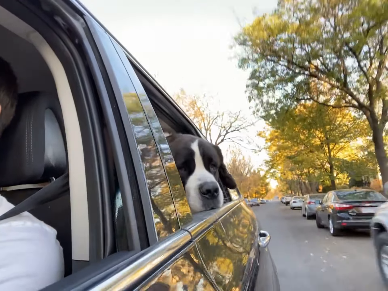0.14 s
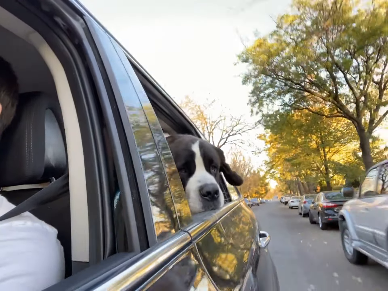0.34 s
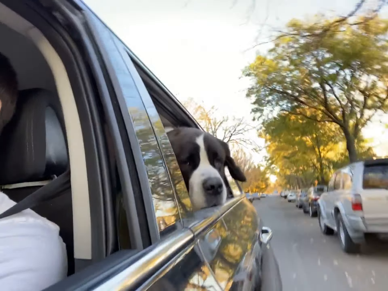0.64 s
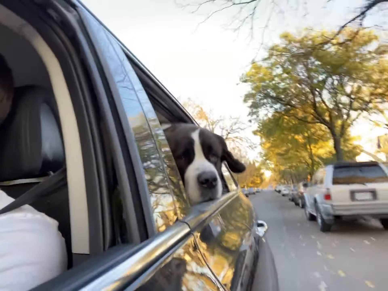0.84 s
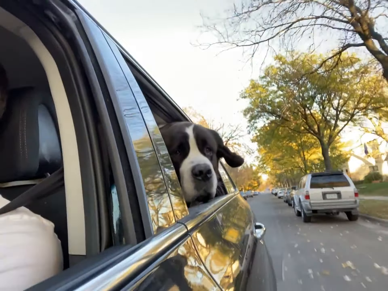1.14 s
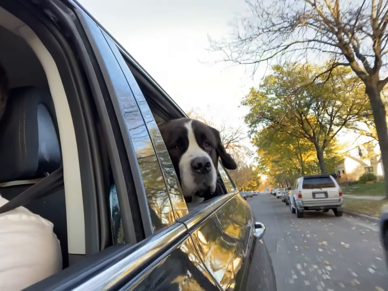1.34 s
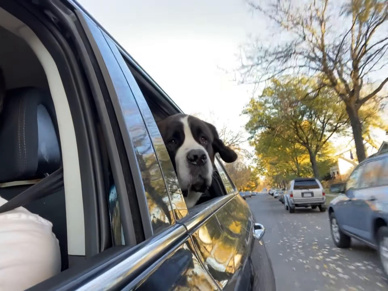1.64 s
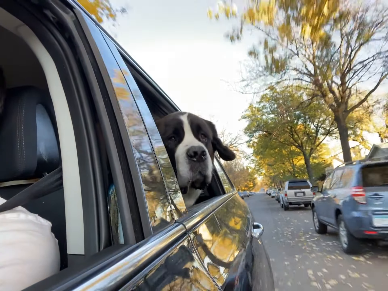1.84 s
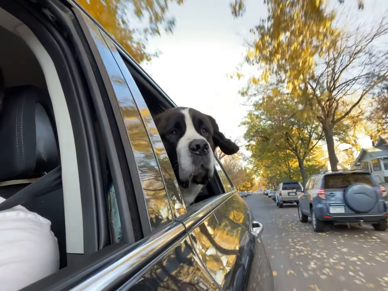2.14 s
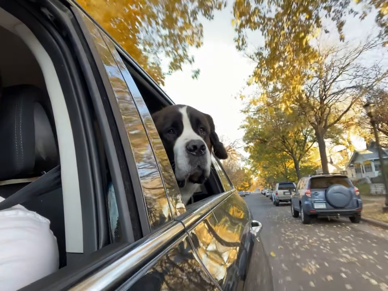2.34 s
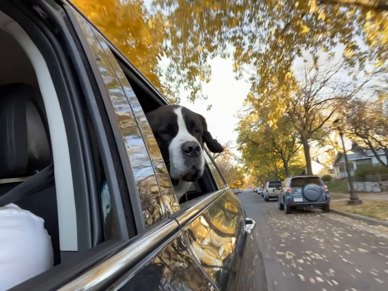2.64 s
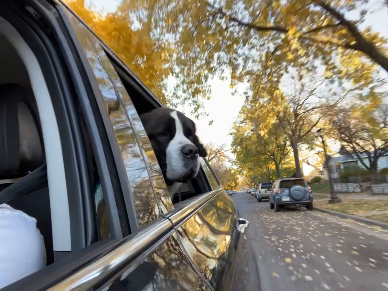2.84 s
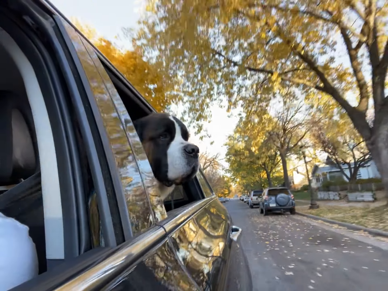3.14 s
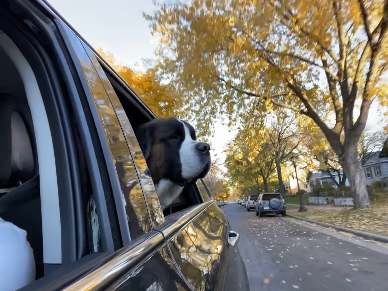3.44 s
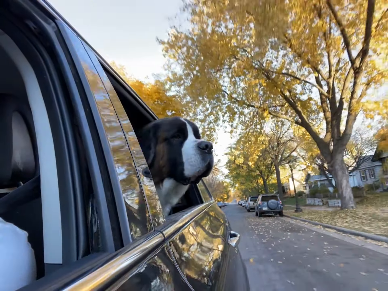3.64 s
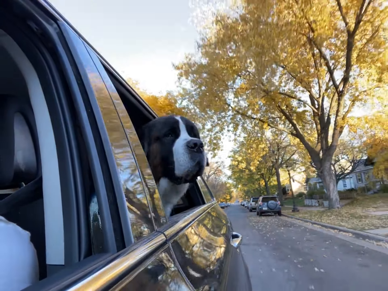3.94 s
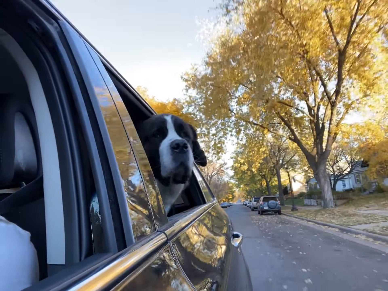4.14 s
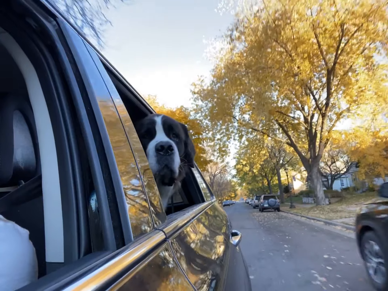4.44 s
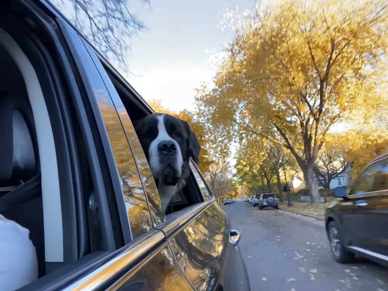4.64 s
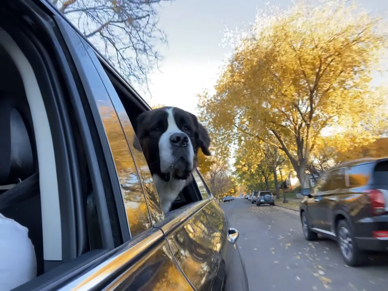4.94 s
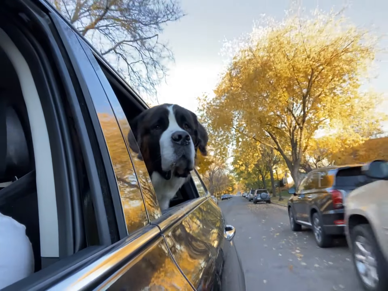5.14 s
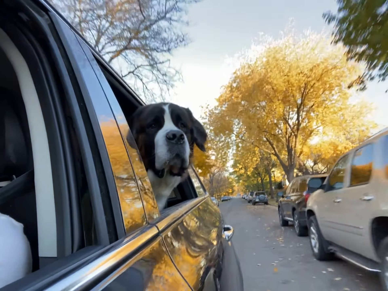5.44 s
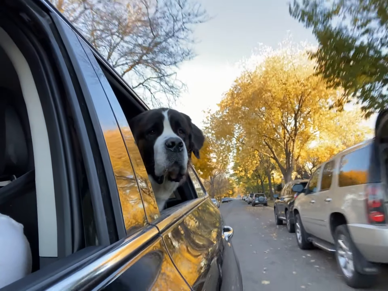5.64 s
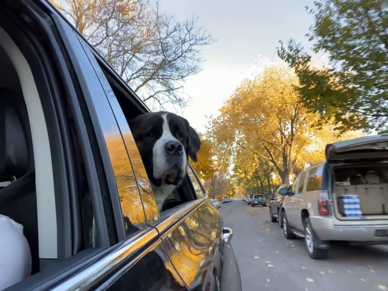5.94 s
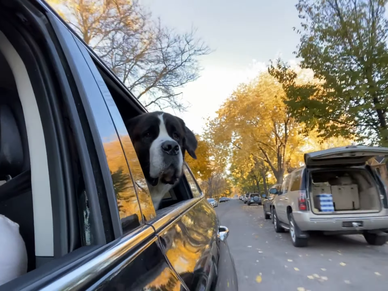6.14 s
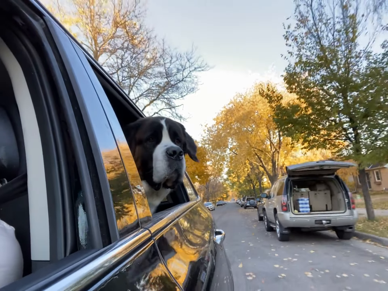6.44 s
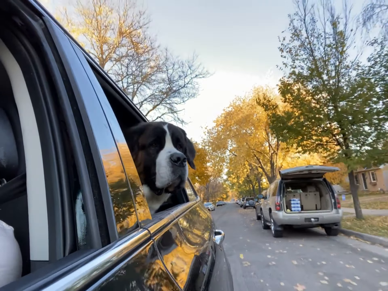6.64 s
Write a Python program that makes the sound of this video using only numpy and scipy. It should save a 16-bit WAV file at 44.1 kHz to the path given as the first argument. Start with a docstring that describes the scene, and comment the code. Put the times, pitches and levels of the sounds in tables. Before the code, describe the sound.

Rough gusting wind thumps and flutters right on the microphone as a car rolls down a street, faint tyre hiss buried underneath.

```python
"""Wind rumbles, flutters and thuds on a microphone held out of the window of a car rolling down a leafy street.
Faint tyre hiss, swells off parked cars and crisp ticks lie underneath.
One air stream sets the rumble, flutter and small snaps: it gusts, lets go ever more often,
drops away near the end and partly returns. Listed vortices add short falling thuds; a limiter rounds
off the biggest."""
import sys
import numpy as np
from scipy import signal
from scipy.fft import rfft, irfft
from scipy.io import wavfile
from scipy.ndimage import uniform_filter1d, minimum_filter1d

SR = 44100
rng = np.random.default_rng(int(sys.argv[2]) if len(sys.argv) > 2 else 0)


def to_wav(sig):
    """Store sig (one row per channel, or 1-D mono) as 16-bit WAV at the path in sys.argv[1].

    Samples outside -1..1 are clipped; the rate is SR.
    """
    pcm = np.clip(np.atleast_2d(sig), -1, 1) * 32767
    pcm = np.round(pcm).astype(np.int16)
    wavfile.write(sys.argv[1], SR, pcm.T)  # frames by channels


N = 298998
TIME_S = np.arange(N) / SR
FREQS_HZ = np.fft.rfftfreq(N, 1 / SR)

# Tyre roar and grit sizzle. Each row: time in seconds, relative roar level in dB, relative sizzle level in dB.
TYRE_LEVELS = [(0, -60, -74), (.6, -61.5, -73), (1.15, -58, -65), (1.45, -61, -69), (2.2, -60.5, -70),
               (3.2, -61, -70), (4.3, -60, -69), (5.1, -61, -65.5), (6.06, -63, -69), (6.16, -60.5, -68),
               (6.78, -61.5, -67.5)]
# Rush of the tread on the asphalt. Each row: time in seconds, relative level in dB.
TREAD_LEVELS = [(0, -51.5), (.7, -52), (2.1, -55), (3.8, -49), (4.8, -50.5), (5.2, -61), (5.9, -78),
                (6.7, -72)]
# Spectrum of the rolling roar. Each row: frequency in Hz, relative density in dB.
ROAR_SPECTRUM = [(40, 23.5), (150, 37), (400, 22.5), (650, 14), (1000, 16.5), (1500, 8.5), (2200, 4),
                 (3000, 2.5), (5000, 0), (8000, -4.5), (10000, -13.5), (15000, -29)]
# Spectrum of the tread rush. Each row: frequency in Hz, relative density in dB.
TREAD_SPECTRUM = [(500, -17.5), (1200, 10), (2200, 9), (2900, 1.5), (4200, -10), (7000, -32.5),
                  (12000, -40)]
# Spectrum of the grit and leaf sizzle. Each row: frequency in Hz, relative density in dB.
SIZZLE_SPECTRUM = [(3000, -36), (7000, -7), (9500, 0.5), (12000, -1), (14000, -5), (16000, -19)]
# Resonances of roar and tread. Each row: centre in Hz, full width in Hz, boost in dB (negative dips).
TYRE_RESONANCES = [(890, 110, 3), (2150, 190, 2.5), (3480, 220, 3.5), (4300, 250, -0.5), (5970, 500, 1),
                   (8700, 600, 2)]
# Tyre noise off parked cars. Each row: centre in seconds, Gaussian spread in seconds, level in dB,
# centre frequency in Hz, Gaussian spread in octaves.
PARKED_CAR_SWISHES = [(.58, 0.11, -60, 4600, 0.36), (1.12, 0.23, -58.5, 4200, 0.19),
                      (4.098, 0.23, -61, 1990, 0.25), (4.8, 0.12, -55, 2300, .25)]
# Crisp street ticks. Each row: start in seconds, level in dB, centre frequency in Hz, decay to 1/e in seconds.
STREET_TICKS = [(.8276, -57, 11000, .012), (1.1364, -60, 12000, .03), (1.4731, -52, 10000, .003),
                (1.7425, -55, 9500, .01), (1.9266, -51, 12000, .003), (2.051, -44, 8000, 0.0027),
                (2.082, -55, 14000, .002), (2.1935, -58, 11000, .005), (2.2154, -55, 10000, .007),
                (3.9285, -54, 9500, .006), (5.478, -56, 13000, .015), (5.5027, -41, 5200, 0.0022),
                (6.1954, -49, 7500, .003), (6.6259, -51, 6070, .012)]
# Base strength of the air stream. Each row: time in seconds, level in dB.
STREAM_LEVELS = [(0, -11), (1, -12), (2.6, -11.5), (3.8, -13.5), (4.6, -13.5), (5.2, -12), (5.8, -14),
                 (6.26, -18), (6.42, -31.5), (6.78, -18.5)]
# The stream lets go. Each row: centre in seconds, Gaussian spread in seconds, depth in dB (negative lifts).
STREAM_LULLS = [(.41, 0.009, 6), (.495, .012, 6.5), (.83, 0.0058, 13), (1.52, .012, 1), (1.625, 0.025, 5),
                (2.22, 0.037, 3.5), (2.55, 0.011, 14.5), (2.75, 0.0064, 18.5), (3.18, 0.009, 11),
                (3.245, 0.0081, -0.5), (3.95, 0.011, 10.5), (4.37, 0.017, 3.5), (4.91, 0.075, 1),
                (5.03, 0.026, 9), (5.31, 0.045, 10), (5.45, .015, 8.5), (5.605, 0.038, 7.5),
                (5.87, 0.012, 8.5), (5.945, 0.014, 9), (6.108, 0.029, 21.5), (6.46, .03, 3.5),
                (6.63, .018, 19.5), (6.73, 0.017, 11.5)]
# Broad eddies on the diaphragm. Each row: centre in seconds, Gaussian spread in seconds,
# rumble boost in dB (negative cuts).
BROAD_THUMPS = [(2.59, 0.021, 5), (2.77, 0.0071, -3), (3.28, 0.0077, 9.5), (3.98, 0.024, 6.5),
                (4.99, 0.01, 13.5), (5.7, 0.017, 4), (6.02, 0.027, 4.5), (6.25, 0.027, 7),
                (6.58, 0.019, 10.5)]
# Spectrum of the large eddies. Each row: frequency in Hz, relative density in dB.
RUMBLE_SPECTRUM = [(12, -33.5), (28, -46), (40, -27.5), (52, -6), (64, -1.5), (85, 0.5), (115, -3.5),
                   (160, -9), (230, -15.5), (400, -28.5), (900, -81)]
# Spectrum of the small eddies. Each row: frequency in Hz, relative density in dB.
FLUTTER_SPECTRUM = [(60, -15.5), (130, -7), (210, 3.5), (300, -4), (420, -1.5), (600, -8), (800, -9.5),
                    (1000, -15), (1500, -27.5), (2000, -43.5), (3000, -53), (5000, -71)]
# Strongest vortices at the port. Each row: core time in seconds, relative level in dB,
# treble loss in dB per kHz, relative swirl level in dB.
VORTICES = [(0.062, -8.5, 12, -12), (0.1184, -5, 6, -12.5), (0.1239, -5.5, 11, -22), (0.238, -8.5, 27, -17),
            (0.3109, -12.5, 19.5, -3.5), (0.379, -5, 15, -13.5), (.425, -13.5, 23, -20),
            (.4403, -6, 13.5, -25), (0.5124, -4.5, 17, -14), (.571, -8, 15, -10),
            (0.6512, -1.5, 17.5, -8.5), (0.7102, -9, 18, -18), (0.7789, -2.5, 18.5, -4.5),
            (0.8087, -8, 10, -29), (.886, -10, 14.5, -19), (0.92, -12.5, 9, -2), (0.9879, -3.5, 11, -9.5),
            (1.0356, -4, 16.5, -23), (1.1996, -4, 15.5, -15), (1.2244, -7, 13, -3), (1.2699, -15.5, 23, -5),
            (1.3578, 3, 14.5, -16.5), (1.402, -11.5, 22, -5.5), (1.4523, -3, 15.5, -38),
            (1.4661, -1, 14, -11.5), (1.5567, 1, 19.5, -17), (1.603, -13.5, 8.5, -7), (1.653, -9, 28.5, -5),
            (1.735, 0, 13, -20.5), (1.8568, -6.5, 19, -23), (1.89, -16, 10.5, -5.5), (1.9543, -7, 22, -11),
            (1.9939, -7, 26, -23), (2.1281, -9.5, 30.5, -13), (2.1531, -10.5, 18, -22),
            (2.189, -7, 25, -11), (2.2826, -0.5, 11.5, -18.5), (2.3043, -2.5, 11, -27),
            (2.3504, -5, 13.5, -12), (2.4439, -15, 7.5, -26), (2.452, -11.5, 23, -25),
            (2.5855, -8, 23, -20), (2.6691, -7, 13, -18), (2.7045, -5, 18, -12), (2.794, -2.5, 17.5, -25),
            (2.8555, -9.5, 21, 0), (3.01, -3.5, 10.5, -24), (3.059, -8, 20.5, -17),
            (3.096, -2.5, 18.5, -2.5), (3.2052, -4.5, 16, -24), (3.275, -2, 13.5, -3.5),
            (3.483, 6.5, 12.5, -26), (3.5107, 1, 24.5, 5), (3.5477, -11, 24, -2), (3.595, -3, 22.5, -11),
            (3.6366, -9, 14, -15), (3.727, -7, 19.5, -9), (3.7762, -5.5, 20, -10.5),
            (3.832, -4.5, 29, -15.5), (3.8649, -17, 40, -16), (3.9843, -9.5, 21.5, -10),
            (4.049, -12, 12.5, -15), (4.0964, -1, 11, -19), (4.152, -8.5, 19, -11.5),
            (4.244, -6, 17.5, -13), (4.2683, -5, 17, -28), (4.285, -9.5, 21, -1), (4.3266, -4, 17, -10),
            (4.3355, -7, 14, -18), (4.3856, -14, 23, -3.5), (4.4271, -17, 16, -16), (4.5776, -13, 16, -4.5),
            (4.738, -6, 15.5, -5.5), (4.7506, -15, 21, -1), (4.7654, -4.5, 16, -18), (4.794, -8, 22, -12),
            (4.827, -10.5, 20, -18), (4.9802, -5.5, 14.5, -11), (5.0626, -14.5, 12.5, -30),
            (5.143, -8, 47, -17), (5.1747, -6, 14, -24), (5.2027, -13.5, 21, 1), (5.276, -2.5, 22.5, -18.5),
            (5.398, -13.5, 15, -3), (5.4128, -10, 21.5, -4), (5.5545, -12, 27.5, -13),
            (5.6226, -16.5, 37, 1.5), (5.7014, -10.5, 20.5, -16), (5.7619, -11, 21, -18),
            (5.7741, -9, 29.5, 3), (5.8321, -14.5, 17, -21), (5.8993, -11.5, 18.5, -13),
            (5.9659, -21, 40, 4.5), (6.0193, -13.5, 26, -3), (6.1507, -14.5, 27, -5.5),
            (6.1778, -19.5, 41, -8), (6.3722, -25, 26, -4), (6.3926, -22.5, 23.5, -5.5),
            (6.678, -12.5, 32, -5)]

# At FULL_WIND_DB small eddies have strength FLUTTER_DB; they change FLUTTER_DB_PER_DB for each dB of stream.
FULL_WIND_DB, FLUTTER_DB, FLUTTER_DB_PER_DB = -12.5, -18.5, 1.38
EDGE_HZ = 15800  # top of the output band


def gain_of(db):
    """Decibels to amplitude."""
    return 10 ** (np.asarray(db) / 20)


def evened(x):
    """Scales to rms 1."""
    return x / np.sqrt(np.mean(x ** 2) + 1e-20)


def steadied(x, span_s):
    """Scales to rms near 1 over every stretch of about span_s."""
    width = max(int(span_s * SR), 2)
    power = uniform_filter1d(uniform_filter1d(x ** 2, width), width)
    return x / np.sqrt(abs(power) + 1e-12)


def level(table, column):
    """One dB column of a curve as a gain for every sample."""
    rows = np.array(table)
    return gain_of(np.interp(TIME_S, rows[:, 0], rows[:, column]))


def swell_db(table):
    """Gaussian swells, one for each row, summed in dB."""
    t = TIME_S[::32]  # coarse grid for speed
    total_db = sum(db * np.exp(-.5 * ((t - s) / spread_s) ** 2) for s, spread_s, db in table)
    return np.interp(TIME_S, t, total_db)


def colour(points):
    """A spectrum as a gain for every frequency, interpolated over log frequency."""
    hz, db = np.transpose(points)
    return gain_of(np.interp(np.log(FREQS_HZ + 1), np.log(hz), db))


def shaped(x, gains):
    """Filters by a gain for every frequency."""
    return irfft(rfft(x) * gains, N)


def noise(gains):
    """Noise of rms 1 with the given spectrum."""
    return evened(shaped(rng.standard_normal(N), gains))


def add(mix, s, sound):
    """Mixes a sound in at time s, cut off at the edges."""
    start = round(s * SR)
    sound = sound[max(-start, 0):]
    part = mix[max(start, 0):][:len(sound)]
    part += sound[:len(part)]


def ticks(width_octaves=.4):
    """Brief bright crackles: band noise dying exponentially."""
    out, t = np.zeros(N), TIME_S[:SR // 5]
    hz = np.fft.rfftfreq(len(t), 1 / SR) + 1
    for s, tick_db, centre_hz, decay_s in STREET_TICKS:
        band = np.exp(-.5 * (np.log2(hz / centre_hz) / width_octaves) ** 2)
        crackle = evened(irfft(rfft(rng.standard_normal(len(t))) * band, len(t)))
        add(out, s, gain_of(tick_db) * crackle * np.exp(-t / decay_s))
    return out


def swishes():
    """Each parked car returns a soft swell of hiss."""
    out = np.zeros(N)
    for s, spread_s, swish_db, centre_hz, octaves in PARKED_CAR_SWISHES:
        band = np.exp(-.5 * (np.log2((FREQS_HZ + 1) / centre_hz) / octaves) ** 2)
        swell = np.exp(-.5 * ((TIME_S - s) / spread_s) ** 2)
        out += gain_of(swish_db) * swell * noise(band)
    return out


def tyres(roar_db=1.0, tread_db=-1.5, sizzle_db=0.5, grain_db=3.5):
    """Resonant rolling roar and tread rush, plus a grainy sizzle from grit and dry leaves."""
    roar = noise(colour(ROAR_SPECTRUM))
    roar /= np.std(shaped(roar, (FREQS_HZ > 4000) & (FREQS_HZ < 8000)))  # level is set by its hiss
    roar = gain_of(roar_db) * level(TYRE_LEVELS, column=1) * roar
    tread = gain_of(tread_db) * level(TREAD_LEVELS, column=1) * noise(colour(TREAD_SPECTRUM))
    ring_db = sum(boost_db / (1 + (2 * (FREQS_HZ - hz) / width_hz) ** 2)
                  for hz, width_hz, boost_db in TYRE_RESONANCES)
    grains = gain_of(grain_db * noise(1 / (1 + FREQS_HZ / 300)))
    sizzle = evened(noise(colour(SIZZLE_SPECTRUM)) * grains)
    sizzle = gain_of(sizzle_db) * level(TYRE_LEVELS, column=2) * sizzle
    return shaped(roar + tread, gain_of(ring_db)) + sizzle


def airflow(gust_db=2.0, gust_hz=11, stall_db=1.0, stall_lead_s=0.004, stall_s=0.0083):
    """The stream gusts, lets go and stalls just before each big vortex; small eddies fade faster than large."""
    gusts = noise(FREQS_HZ / (FREQS_HZ + gust_hz) / np.sqrt(1 + (FREQS_HZ / gust_hz) ** 6))
    stalls = [(row[0] - stall_lead_s, stall_s, stall_db) for row in VORTICES]
    change_db = gust_db * gusts - swell_db(STREAM_LULLS) - swell_db(stalls)
    stream = level(STREAM_LEVELS, column=1) * gain_of(change_db)
    large = stream * gain_of(swell_db(BROAD_THUMPS))
    small = gain_of(FLUTTER_DB) * (stream / gain_of(FULL_WIND_DB)) ** FLUTTER_DB_PER_DB
    return large, small


def port(x, bass_lag_s=0.01618, corner_hz=140, steepness=1.71):
    """Bass passes the microphone port later than treble, so every jolt becomes a quick falling chirp."""
    lag_s = bass_lag_s / (1 + (FREQS_HZ / corner_hz) ** steepness)
    phase = -2 * np.pi * np.cumsum(lag_s) * SR / N  # group delay summed over frequency
    return shaped(x, np.exp(1j * phase))


def rumble(strength, db=-2.7, lump_db=1.5, lump_hz=22):
    """Large eddies push slowly on the diaphragm, in uneven lumps."""
    lump_band = np.exp(-(FREQS_HZ / lump_hz - 1) ** 2 * 4)
    lumps = evened(gain_of(lump_db * noise(lump_band)))
    return gain_of(db) * strength * lumps * steadied(noise(colour(RUMBLE_SPECTRUM)), span_s=0.065)


def flutter(strength, db=-4.0, clump_db=7.5, clump_rise=0.033, clump_hz=70, peak_limit=2.36, brighten=0.45):
    """Small eddies come in clumps; the smaller they are, the more they crowd into the fastest moments."""
    churn = noise(FREQS_HZ / (FREQS_HZ + 8) / np.sqrt(1 + (FREQS_HZ / clump_hz) ** 4))
    churn = np.minimum(churn, peak_limit)
    air = noise(colour(FLUTTER_SPECTRUM))
    octave = np.clip(np.log2((FREQS_HZ + 1) / 125), 0, 5)
    out = np.zeros(N)
    breeze = evened(uniform_filter1d(strength, size=SR // 3))  # a slack stream sheds fewer small eddies
    for k in range(6):  # overlapping octave bands
        band = np.maximum(1 - abs(octave - k), 0)
        clumps = evened(gain_of(clump_db * 2 ** (clump_rise * (k - 2)) * churn))
        out += clumps * breeze ** (brighten * k) * shaped(air, band)
    return gain_of(db) * strength * steadied(port(out), span_s=0.26)


def eddy_spectrum(hz, db_per_khz, tilt_db_per_octave=1.0, low_hz=105, knee_hz=1050, curve=1.096):
    """A vortex crossing the port is a smooth pressure pulse: the wider its core, the faster its treble falls."""
    fall_db = db_per_khz * knee_hz / 10 ** 3 * (hz / knee_hz) ** curve
    spectrum = gain_of(tilt_db_per_octave * np.log2(hz) - fall_db) / np.sqrt(1 + (low_hz / hz) ** 6)
    return spectrum * len(hz) / spectrum[hz > 400].sum()  # the part above 400 Hz could peak near 1


def eddy_pulse(spectrum):
    """The pulse pushes, sucks or does both, by the path of the vortex, drawn as a random phase."""
    pulse = np.fft.fftshift(irfft(spectrum * np.exp(2j * np.pi * rng.random())))
    return pulse * signal.windows.hann(len(pulse))


def snaps(strength, db=3.5, spread_db=8.5, sharpest_db_per_khz=11.5, dullest_db_per_khz=40,
          slack_db=12.0, hits_per_s=95, count=10, size=4096):
    """A scatter of lesser vortices of ten widths; the narrow ones fade first when the stream slackens."""
    hz, out = np.fft.rfftfreq(size, 1 / SR) + 1, np.zeros(N)
    stream = uniform_filter1d(strength, size=SR // 3)
    force = gain_of(spread_db * rng.uniform(-1, 1, N))
    struck = rng.random(N) < hits_per_s / SR
    hits = struck * force * np.minimum(strength, 0.78 * stream)  # the mean flow caps the stream's share
    width = rng.integers(0, count, N)
    fullness = np.minimum(evened(stream), 1) - 0.5
    for k, db_per_khz in enumerate(np.linspace(sharpest_db_per_khz, dullest_db_per_khz, count)):
        fade = gain_of(slack_db * fullness * (-k / count))  # a full stream holds the wide ones down
        pulse = eddy_pulse(eddy_spectrum(hz, db_per_khz))
        out += signal.oaconvolve(hits * (width == k) * fade, pulse, "same")
    return gain_of(db) * port(out)


def buffets(db=1.0, swirl_db=-3.5, swirl_s=0.0038, swirl_lag_s=0.0012, swirl_low_hz=450,
            swirl_top_hz=1900, wake_db=-2.5, wake_hz=190, size=4096):
    """The strongest vortices: a hard core with a low wake, wrapped in a few milliseconds of ragged swirl."""
    hz, out = np.fft.rfftfreq(size, 1 / SR) + 1, np.zeros(N)
    t = (np.arange(size) - size // 2) / SR
    swirl_band = hz ** 2 / (hz ** 2 + swirl_low_hz ** 2) / np.sqrt(1 + (hz / swirl_top_hz) ** 4)
    swirl_span = np.exp(-.5 * ((t - swirl_lag_s) / swirl_s) ** 2)
    wake = 1 + gain_of(wake_db) / (1 + (hz / wake_hz) ** 4)
    for s, core_db, db_per_khz, ragged_db in VORTICES:
        spectrum = eddy_spectrum(hz, db_per_khz)
        core = eddy_pulse(spectrum * wake)
        swirl = evened(irfft(rfft(rng.standard_normal(size)) * spectrum * swirl_band)) * swirl_span
        add(out, s + t[0], gain_of(core_db) * (core + gain_of(swirl_db + ragged_db) * swirl))
    return gain_of(db) * port(out)


def scene():
    """Wind on the microphone over the sound of the street."""
    street = ticks() + swishes() + tyres()
    large, small = airflow()
    wind = rumble(large) + flutter(small) + snaps(small) + buffets()
    return (street + wind)[None]


def record(dry, split_hz=3000, ceiling=.65, ramp_s=.0014):
    """A fast look-ahead limiter rounds off the biggest buffets and lets the treble through; then a low-pass."""
    width = 2 * int(ramp_s * SR / 2) + 1
    treble = shaped(dry, 1 - 1 / (1 + (FREQS_HZ / split_hz) ** 6))
    allowed = np.minimum(1, ceiling / (abs(dry) + 1e-9))
    allowed = minimum_filter1d(allowed, 2 * width + 1)  # looks ahead and holds
    gain = uniform_filter1d(uniform_filter1d(allowed, width), width)
    limited = treble + (dry - treble) * gain
    low_pass = signal.firwin(511, EDGE_HZ, window=("kaiser", 9), fs=SR)
    return signal.oaconvolve(limited, low_pass[None], "same")


dry = scene()
out = record(dry)
to_wav(out)
```